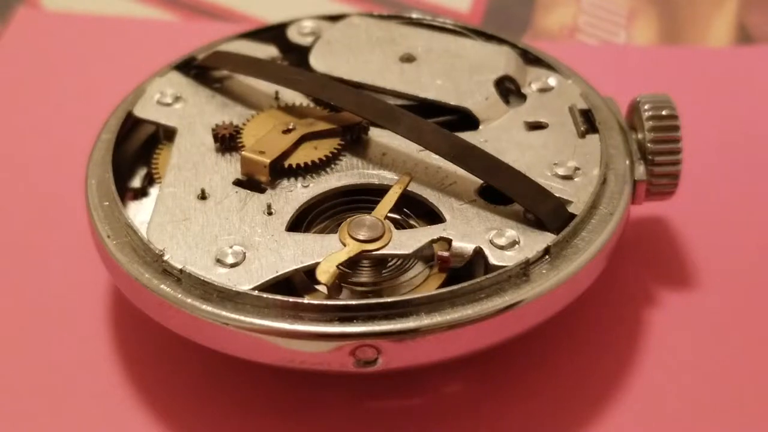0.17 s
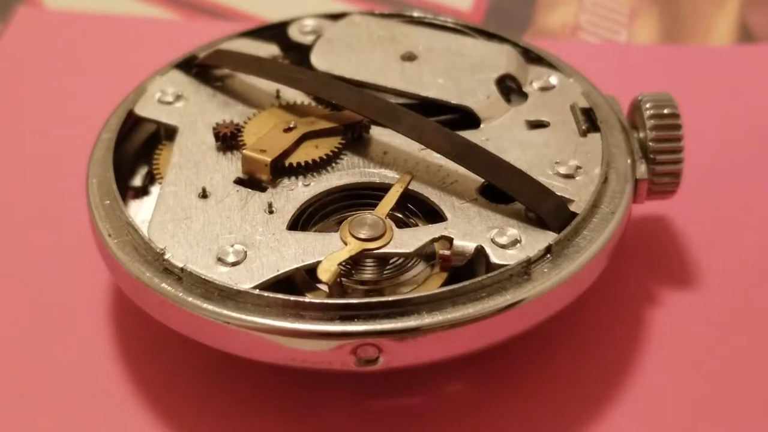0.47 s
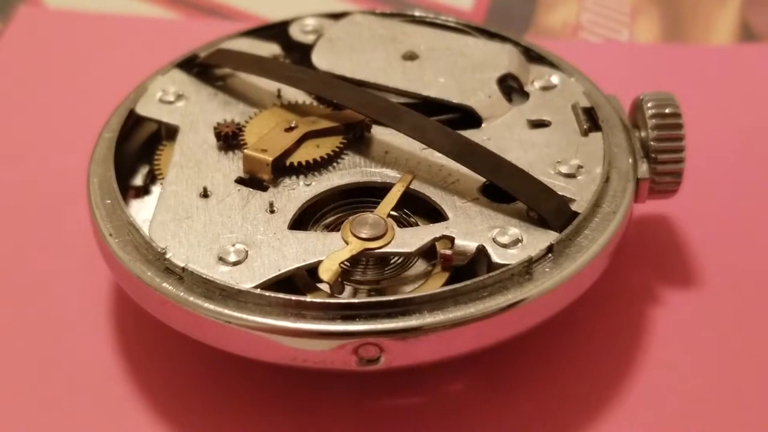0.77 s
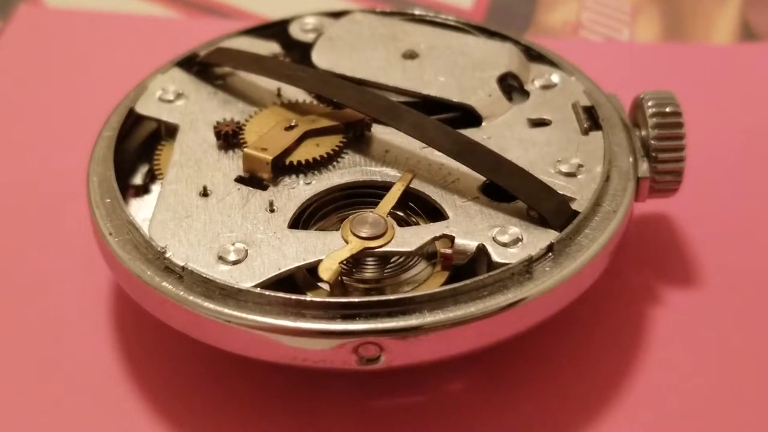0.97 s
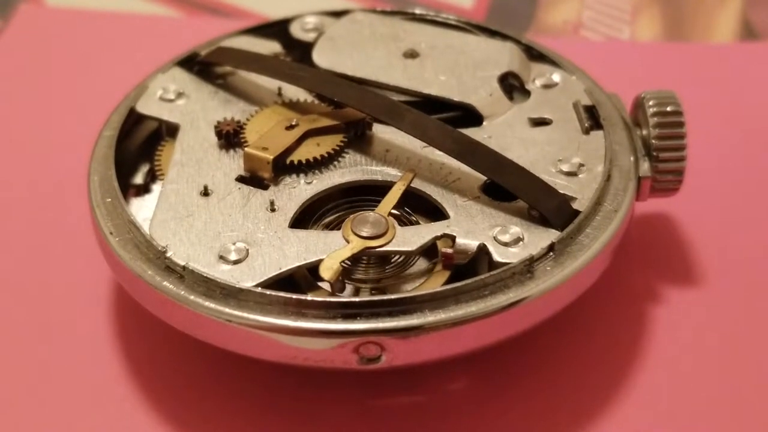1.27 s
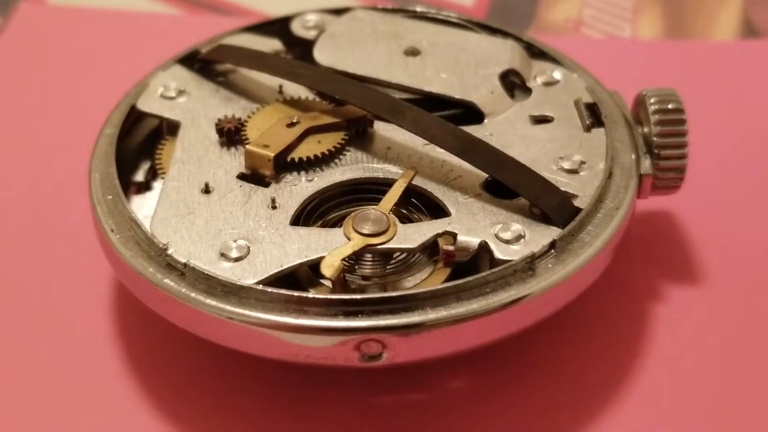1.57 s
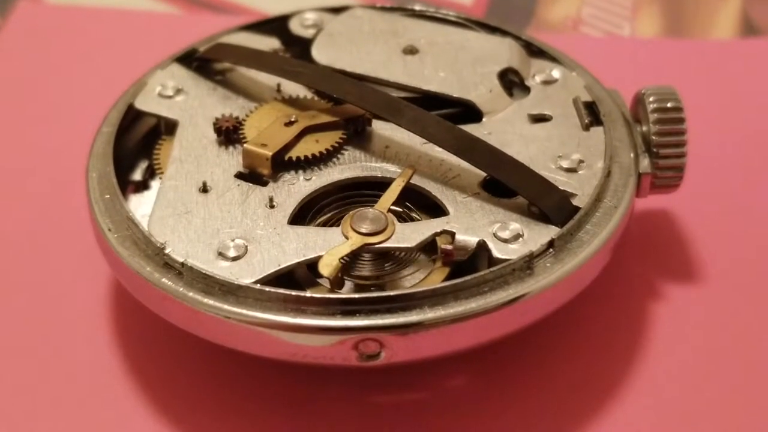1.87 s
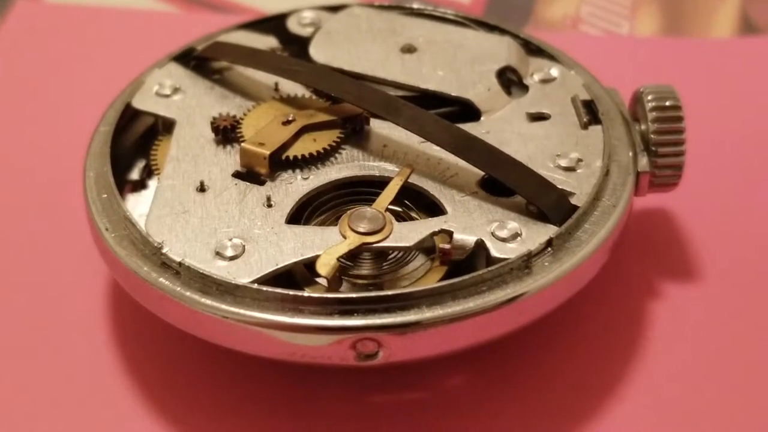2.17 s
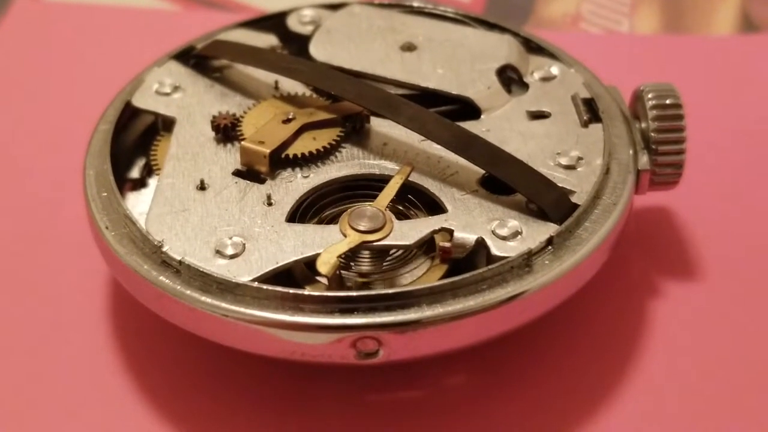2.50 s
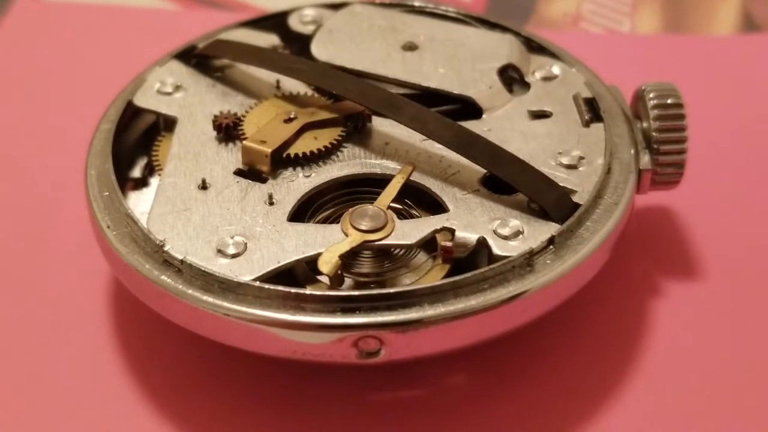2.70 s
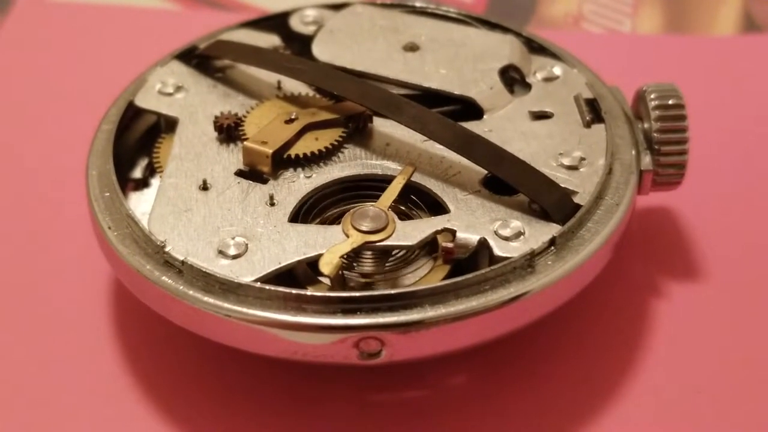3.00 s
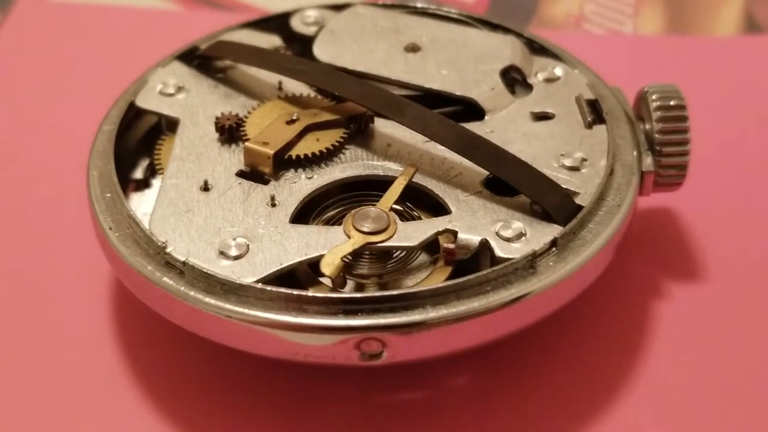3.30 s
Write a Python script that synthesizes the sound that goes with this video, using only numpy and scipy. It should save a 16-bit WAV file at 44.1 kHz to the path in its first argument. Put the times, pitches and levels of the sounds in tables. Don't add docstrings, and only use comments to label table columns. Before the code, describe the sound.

Open watch movement gives crisp, bright metallic tick-tock on the left, soft low handling on the right

```python
import sys
import numpy as np
from scipy import signal
from scipy.fft import rfft, irfft
from scipy.io import wavfile
from scipy.ndimage import map_coordinates

SR = 44100
rng = np.random.default_rng(int(sys.argv[2]) if len(sys.argv) > 2 else 0)


def persist_wave(psi):
    counts = np.round(np.clip(psi, -1, 1) * 32767).astype(np.int16)
    wavfile.write(sys.argv[1], SR, np.atleast_2d(counts).T)


def makeup_ratio(level_db):
    decades = np.asarray(level_db, float) / 20
    return 10 ** decades


N = 152145
SLIP_RISE_S = 0.00071

# frequency in Hz, level in dB.
JANGLE = [(2000, 0), (5000, 0), (7800, -8), (8800, -12), (12000, -17), (15700, -25)]


def unit(x):
    return x / np.sqrt(np.mean(x ** 2) + 1e-20)


def along(points, hz):
    f, v = np.transpose(points)
    return np.interp(np.log(hz + 1), np.log(f + 1), v)


def wobble(rate_hz):
    knots = rng.standard_normal(int(N * rate_hz / SR) + 4)
    return map_coordinates(knots, [np.arange(N) * rate_hz / SR])


def noise(spectrum, size, channels=1):
    hz = np.fft.rfftfreq(size, 1 / SR)
    inside = (hz >= spectrum[0][0]) * (hz <= spectrum[-1][0])
    gain = makeup_ratio(along(spectrum, hz)) * inside
    white = rng.standard_normal((channels, size))
    return unit(irfft(rfft(white) * gain, size))


def add(track, s, sound):
    at = round(s * SR)
    part = track[max(at, 0):][:len(sound) + min(at, 0)]
    part += sound[max(-at, 0):][:len(part)]


def rumble():
    # frequency in Hz, density in dB per Hz.
    hand_spectrum = [(8.8, -43), (15, -3), (60, -0.5), (92, 4.5), (380, -23), (425, -30.5), (700, -40),
                     (910, -58), (1540, -120)]
    lumps = makeup_ratio(1.5 * wobble(21.937))
    held = unit(lumps * noise(hand_spectrum, N)) * makeup_ratio([[-12], [0]])
    separate = noise(hand_spectrum, N, channels=2) * makeup_ratio([[-6], [0]])
    return makeup_ratio(-53) * (held + makeup_ratio(-10.5) * separate)


def hiss():
    # frequency in Hz, density in dB per Hz.
    hiss_spectrum = [(290, -48), (500, -5.5), (700, -8.5), (2250, -10.5), (7030, -15), (13300, -12),
                     (14200, -8.5), (15700, -14)]
    correlation = 0.2
    a, b = noise(hiss_spectrum, N, channels=2)
    turn = np.arccos(correlation) / 2
    shared, opposed = np.cos(turn) * a, np.sin(turn) * b
    return makeup_ratio(-74) * np.array([shared + opposed, shared - opposed])


def blow(modes, rise_s, spread_db, turns, size=2048):
    t = np.arange(size) / SR
    hz, width_hz, db = np.transpose(modes)[:, :, None]
    level_chance, phase_chance = rng.standard_normal((2, len(modes), 1))
    swell = np.sin(np.pi / 2 * np.clip(t / rise_s, 0, 1)) ** 2
    decay = np.exp(-np.pi * width_hz * np.maximum(t - rise_s, 0))
    wave = np.cos(2 * np.pi * (hz * (t - rise_s) + turns * phase_chance))
    gain = makeup_ratio(db + spread_db * level_chance) * np.sqrt(width_hz / 100)
    return -swell * np.sum(gain * decay * wave, axis=0)


def burst(spectrum, db, t60_s, rise_s, size):
    t = np.arange(size) / SR
    return makeup_ratio(db - 60 * t / t60_s) * noise(spectrum, size)[0] * np.clip(t / rise_s, 0, 1)


def locks():
    # start in seconds, peak in dB.
    lock_events = [(-.0415, -14), (0.2043, -16.5), (0.4596, -15.5), (0.7054, -17), (0.96, -15.5),
                   (1.205, -16.5), (1.4594, -15), (1.7054, -17), (1.9587, -14.5), (2.2042, -18),
                   (2.4573, -14), (2.7033, -15), (2.9562, -14.5), (3.2024, -16.5)]
    rebound_ms = [5, 4.1, 5.5, 4.3, 4.6, 4.1, 4.5, 3.9, 5.5, 5, 5.2, 3.7, 5.8, 4.5]
    rebound_db = [-11, -7.5]
    # frequency in Hz, width in Hz, level in dB.
    tick_lock = [(3277, 90, -17), (5052, 80, 0), (5188, 183, 3), (6047, 360, -3), (6320, 100, -18),
                 (7156, 330, -5), (7660, 150, -18), (10220, 660, -15.5)]
    tock_lock = [(2880, 110, -28.5), (3680, 190, -13.5), (4840, 160, 0.5), (5320, 220, -6), (5980, 240, -9),
                 (6610, 120, -12), (7700, 220, -15), (10070, 310, -23.5)]
    tick_plates = [(3015, 65, -26), (3474, 65, -20), (3903, 71, -22), (4830, 34, -21), (5640, 120, -18),
                   (6900, 65, -25.5), (7900, 80, -28.5), (12960, 200, -31.5)]
    tock_plates = [(2910, 18, -30.5), (3492, 35, -27.5), (4020, 77, -16), (4670, 30, -21.5),
                   (5800, 90, -18.5), (6920, 130, -18.5), (8240, 70, -26), (12680, 370, -34)]
    tick_ring = [(2918, 11, -41), (3424, 14, -35), (4900, 14, -31), (5120, 11, -31), (5300, 10, -31),
                 (5520, 11, -33), (6977, 10, -42), (7413, 12, -43)]
    tock_ring = [(4870, 7.7, -37.5), (5250, 14, -36), (5512, 10.28, -43), (6000, 17, -46),
                 (6300, 10, -44.5), (7400, 10, -46)]
    # frequency in Hz, level in dB.
    crack_spectrum = [(1500, -72), (2500, -18), (4000, -10.5), (6000, -12), (9500, -24), (14000, -26),
                      (16400, -53.5)]
    tock = tock_lock, tock_plates, tock_ring
    tick = tick_lock, tick_plates, tick_ring
    x = np.zeros(N)
    for k, ((s, db), after_ms) in enumerate(zip(lock_events, rebound_ms)):
        body, plates, ring = [tock, tick][k % 2]
        for late_s, loss_db in (0, 0), (after_ms / 1000, rebound_db[1 - k % 2]):
            crack = burst(crack_spectrum, -4, 0.017, SLIP_RISE_S, size=2048)
            hit = blow(body, 0.001097, 0.53, 0.12) + crack
            add(x, s + late_s, makeup_ratio(db - 5.5 + loss_db) * hit)
        add(x, s, makeup_ratio(db) * blow(plates, .002, 1.6, 1, size=4096))
        detune = 1 + [.016, 0, 0] * rng.standard_normal((3 * len(ring), 1))
        cluster = np.tile(ring, (3, 1)) * detune
        ringing = blow(cluster, .004, 1.8, 0.95, size=11000)
        jangle = burst(JANGLE, -39.5, 0.32, 0.0034, size=11000)
        add(x, s, makeup_ratio(db) * (ringing + jangle))
    return x


def room(x):
    # frequency in Hz, T60 in seconds.
    room_t60 = [(2000, 0.6), (5000, 0.29), (12000, 0.23)]
    room_db = [-29, -41]
    wet, step = np.zeros((2, N + SR)), SR // 4
    for start in range(-SR // 8, N, step):
        hz, t, z = signal.stft(rng.standard_normal((2, SR // 3)), SR, nperseg=256)
        decay = makeup_ratio(-60 * t / along(room_t60, hz)[:, None])
        tail = signal.istft(z * decay, SR, nperseg=256)[1]
        tail = tail / np.linalg.norm(tail[0])
        part = signal.fftconvolve(x[None, max(start, 0):start + step], tail, axes=1)
        wet[:, max(start, 0) + 130:][:, :part.shape[1]] += part
    return wet[:, :N] * makeup_ratio(room_db)[:, None]


def nudge(body, rise_s):
    hz, width_hz, db = np.transpose(body)
    moved = np.transpose([hz * (1 + 0.015 * rng.standard_normal(len(hz))), width_hz, db])
    grit = burst(JANGLE, -18.5, 0.044, rise_s, size=1024)
    return blow(moved, rise_s, 2.44, 0.96, size=1024) / 2 + grit


def loose_part():
    # start in seconds, peak in
    # dB.
    knocks = [(0.1807, -49.5), (0.202, -34.5), (0.2283, -37.5), (0.263, -46), (0.2745, -49.5),
              (0.6882, -41), (0.7309, -39.5), (0.759, -44.5), (1.1768, -42), (1.19, -51.5),
              (1.1947, -33.5), (1.2393, -36.5), (1.287, -38.5), (1.298, -42), (1.3067, -43),
              (1.7308, -39.5), (1.7649, -43), (1.7738, -49.5), (2.19, -43), (2.1937, -38.5),
              (2.2203, -39), (2.2525, -42), (2.2676, -50.5), (2.7196, -36.5), (2.755, -41.5),
              (2.778, -47.5), (3.1867, -47.5), (3.1929, -35), (3.2547, -45.5), (3.2829, -44.5),
              (0.0182, -37.5), (0.0364, -44.5), (0.4275, -35), (0.4437, -28.5), (0.4519, -34.5),
                   (0.4936, -34.5), (0.5237, -39), (0.5373, -46), (0.9239, -37.5), (0.9458, -29.5),
                   (0.991, -36), (1.0285, -38.5), (1.4237, -33.5), (1.4439, -29.5), (1.492, -37),
                   (1.521, -40), (1.9196, -36.5), (1.942, -27.5), (1.975, -39), (2.421, -37.5),
                   (2.4429, -27), (2.4711, -36), (2.9214, -33), (2.943, -28.5), (3.02, -37), (3.0462, -41),
                   (3.0601, -44), (3.424, -37.5), (3.4363, -48), (3.4438, -30.5),
              (1.532, -47),
        (2.0165, -50),
        (2.021, -46),
        (2.5065, -51),
        (2.681, -54),
        (2.6985, -43),
        (2.785, -51),
        (3.212, -38),
    ]
    # frequency in Hz, width in Hz, level in dB.
    loose_modes = [(2483, 169, 1), (2850, 200, -13), (3500, 250, -17), (5080, 200, -14), (6950, 350, -14.5)]
    x = np.zeros(N)
    for s, db in knocks:
        add(x, s, makeup_ratio(db + 1.5) * nudge(loose_modes, 0.00157))
    return x


def fingers():
    # start in seconds, level in dB, pitch in Hz, snap in dB.
    pulls = [
        (.2248, -13.5, 315, -5.5),
        (.4148, -27, 330, -3),
        (1.2478, -27, 370, -1),
        (1.3132, -20, 370, -14),
        (1.3163, -23, 250, -25),
        (1.2512, -28, 270, -30),
        (.3815, -32, 150, -40),
        (1.7045, -38.5, 131, -38.5),
        (1.5985, -33.5, 217, -25),
    ]
    pushes = [(0.378, -25, 263, -23.5), (1.054, -24.5, 227, -29), (1.3078, -24.5, 275, -39),
              (1.5955, -37, 328, -16), (1.905, -28.5, 151, -35), (2.687, -31.5, 158, -25.5),
              (1.0625, -29.5, 146, -38), (1.1255, -41.5, 200, -35), (1.6545, -41, 260, -30),
              (.062, -43, 233, -37), (3.093, -40.5, 165, -35)]
    # frequency in Hz, level in dB.
    skin_spectrum = [(300, -9), (600, 0.5), (1000, -5.5), (1800, -18)]
    sag = 0.58
    x, t = np.zeros(N), np.arange(SR // 4) / SR
    for k, (s, db, hz, snap_db) in enumerate([*pulls, *pushes]):
        cycles = np.log1p(sag * hz * t) / sag
        bell = np.exp(-((cycles - 3 / 4) / 0.5) ** 2)
        push = bell * np.sin(2 * np.pi * cycles) * np.clip(4 * cycles, 0, 1)
        turn = 2 * np.pi * 2.516 * hz * t
        snap = makeup_ratio(snap_db - 60 * t / 0.0095) * (np.sin(turn) + 0.24 * np.sin(1.78 * turn))
        snap *= 1 - np.exp(-(turn / 4.14) ** 2)
        shell = makeup_ratio(-6 - 60 * t / 0.13) * np.sin(2 * np.pi * 78.6 * t)
        shell *= 1 - np.exp(-(t / 0.027) ** 2)
        rub = burst(skin_spectrum, -40.5, 0.17, .005, size=len(t))
        sign = -1 if k < len(pulls) else 1
        add(x, s, sign * makeup_ratio(db) * (push + snap + shell + rub))
    return x


def slips(track, events, bodies, lengths_s, gain_db, fades_db, count):
    for k, (s, peak_db) in enumerate(events):
        kind = k % len(bodies)
        for n, (late, size) in enumerate(rng.standard_normal((count, 2))):
            later = n > 0
            u = max(n + 0.3 * late, 0) / count * later
            db = peak_db + gain_db - fades_db[kind] * u + 2.5 * size * later
            add(track, s + u * lengths_s[kind], makeup_ratio(db) * nudge(bodies[kind], SLIP_RISE_S))


def unlocks():
    # start in seconds, peak in dB.
    unlock_events = [(0.1568, -53.5), (0.411, -44.5), (0.6558, -52), (0.9088, -45), (1.155, -50.5),
                     (1.4078, -44.5), (1.6557, -52), (1.9067, -44), (2.156, -52.5), (2.4061, -44),
                     (2.6528, -51.5), (2.9055, -40.5), (3.1537, -51), (3.4067, -44.5)]
    # frequency in Hz, width in Hz, level in dB.
    tick_unlock = [(3760, 200, 0), (4150, 200.4, -7), (5070, 200, -9.5), (5700, 180, -0.5),
                   (6860, 250, -14.5), (11100, 400, -18.5)]
    tock_unlock = [(3870, 290, -9), (5100, 300, -5), (5330, 300, 0.5), (7600, 350, -11),
                   (10500, 607, -15.5)]
    unlock_s = [.011, .006]
    unlock_fade_db = [3, 14]
    x = np.zeros(N)
    slips(x, unlock_events, [tick_unlock, tock_unlock], unlock_s, 2.5, unlock_fade_db, count=5)
    return x


def scrapes():
    # start in seconds, peak in dB.
    scrape_events = [
        (0.189, -45),
        (0.6882, -45),
        (1.1891, -45.5),
        (1.6877, -41.5),
        (2.1871, -42.5),
        (2.6868, -41),
        (3.1849, -44),
    ]
    catch_events = [(.4384, -39.5), (0.442, -35.5), (.4444, -37), (0.4464, -30), (0.9418, -36),
                    (0.9467, -32.5), (0.9507, -38), (1.4401, -35), (1.4446, -32.5), (1.4464, -37),
                    (1.45, -33), (1.9394, -35), (1.9423, -33), (1.947, -51), (2.4387, -32.5), (2.4435, -37),
                    (2.4433, -35.5), (2.9382, -33), (2.9432, -30.5), (2.9443, -36.5), (2.9466, -32),
                    (2.9511, -46.5), (3.4376, -35.5), (3.4408, -34), (3.4446, -30.5), (3.4474, -34)]
    # frequency in Hz, width in Hz, level in dB.
    tick_scrape = [(3650, 200, 3.5), (4900, 250, -4), (5960, 240, -9.5), (6890, 250, -11.5),
                   (7530, 300, -16.5), (10700, 400, -17.5)]
    tock_scrape = [(3600, 360, -5.5), (5090, 150, -4), (5320, 190, -3), (7250, 400, -8),
                   (11240, 200, -17.5)]
    scrape_s = [.01]
    catch_s = [.003]
    x = np.zeros(N)
    slips(x, scrape_events, [tick_scrape], scrape_s, 0, [15.5], count=6)
    slips(x, catch_events, [tock_scrape], catch_s, 0.5, [12], count=2)
    return x


def scene():
    watch = locks() + loose_part() + unlocks() + scrapes()
    near_watch = watch * makeup_ratio([[0], [-18.5]])
    near_hand = fingers() * makeup_ratio([[-16], [0]])
    return near_watch + room(watch) + near_hand + rumble() + hiss()


def roll_off(x):
    return signal.sosfilt(signal.butter(12, 16550, fs=SR, output="sos"), x)


def record(dry):
    return roll_off(dry)


dry = scene()
out = record(dry)
persist_wave(out)
```